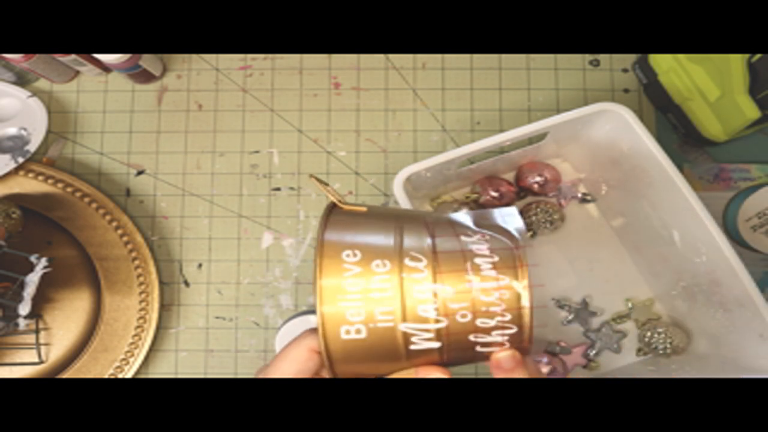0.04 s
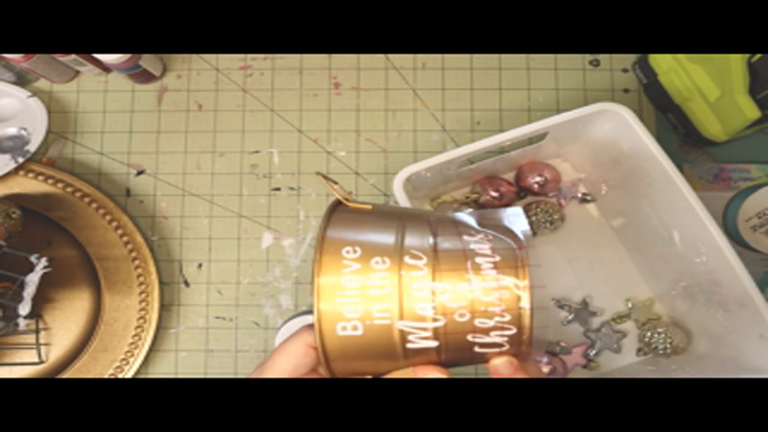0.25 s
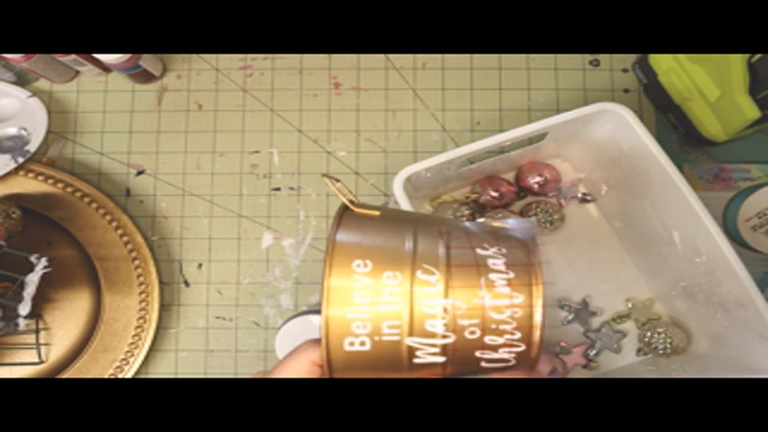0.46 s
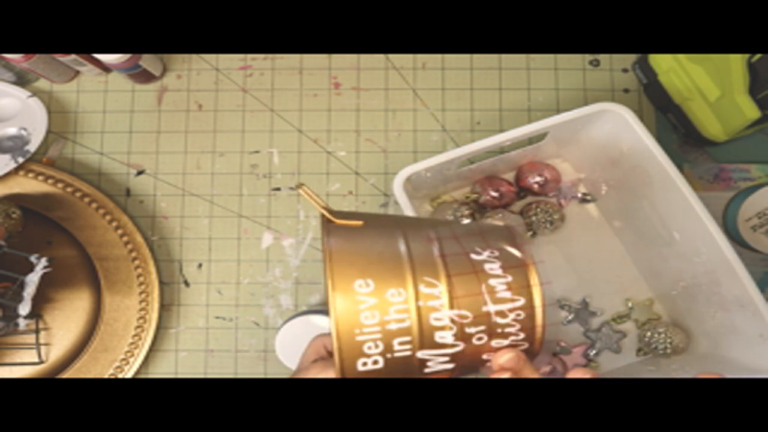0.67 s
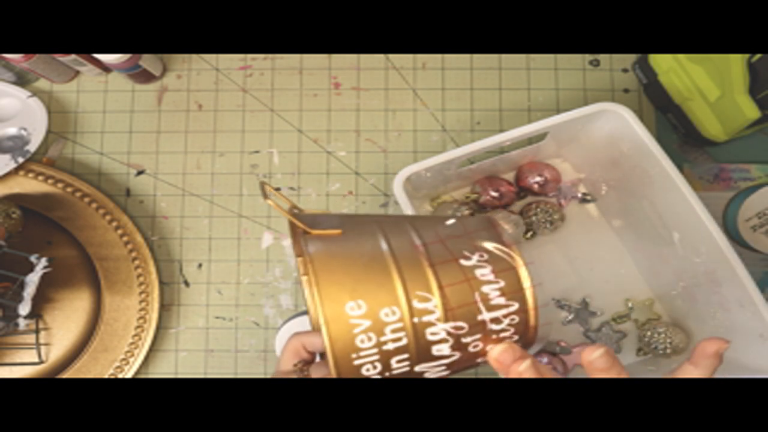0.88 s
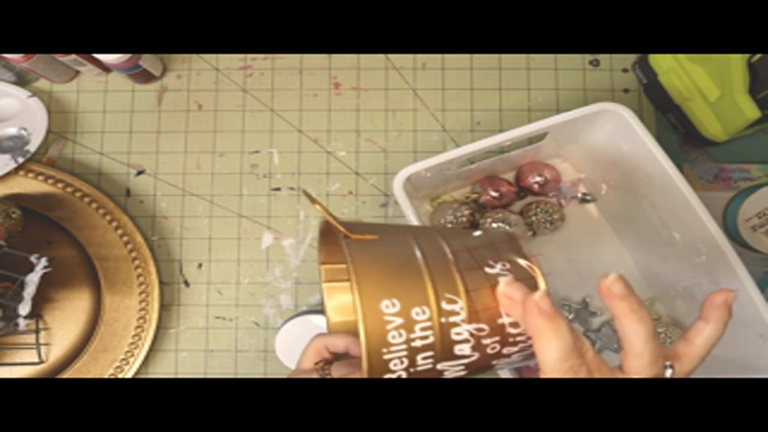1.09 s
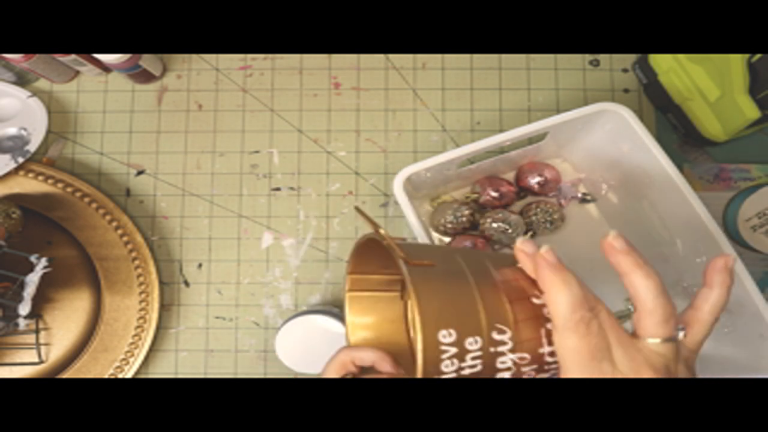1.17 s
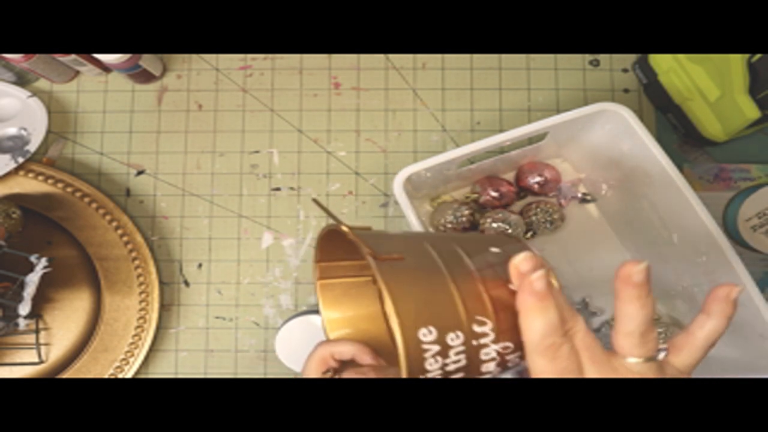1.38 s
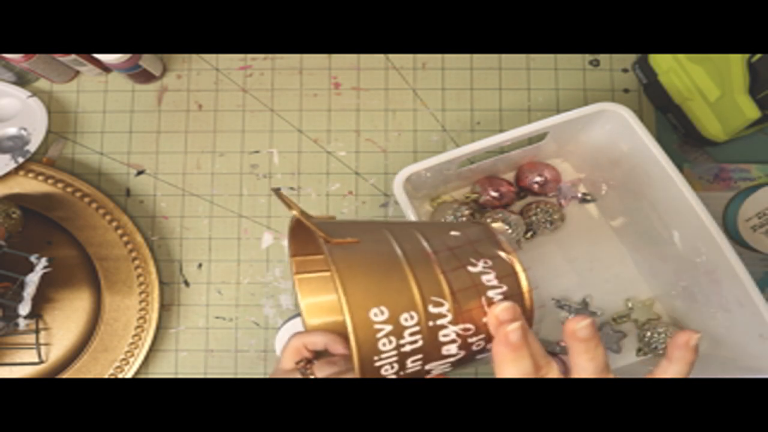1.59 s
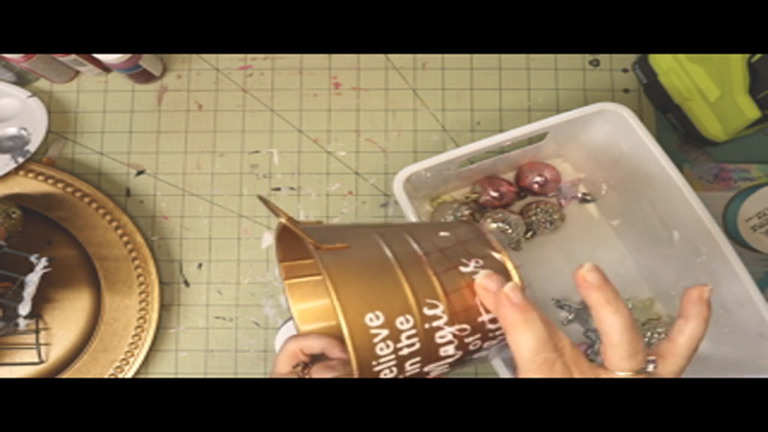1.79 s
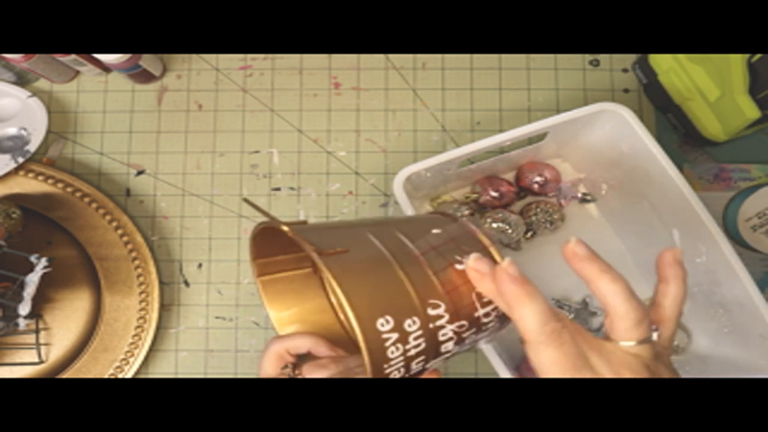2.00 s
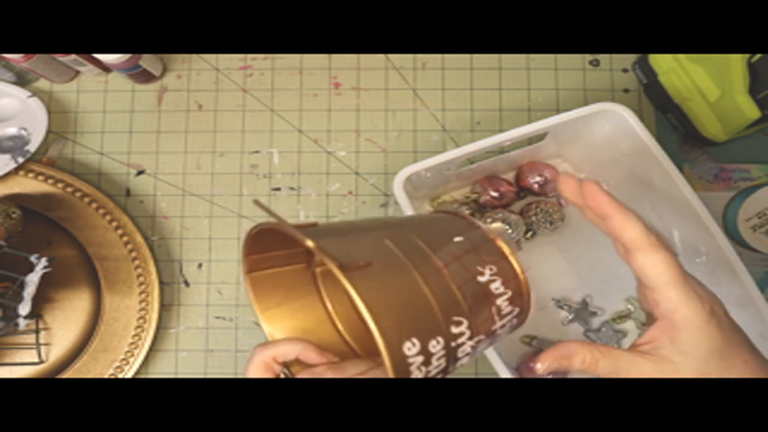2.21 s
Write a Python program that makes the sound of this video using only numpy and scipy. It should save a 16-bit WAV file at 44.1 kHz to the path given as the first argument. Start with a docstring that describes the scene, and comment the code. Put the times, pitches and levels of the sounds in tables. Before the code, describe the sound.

In a small room with a low hum and soft hiss, someone handles a little metal pail near the microphone. A few thin ticks and a faint slide of the palm lead to a sharp clink as the wire handle scrapes and hits the wall. The metal barely rings under the fingers. Following a pause, the handle rattles in quick clicks, pings and scrapes, ending with a few light ticks.

```python
"""A wire handle scrapes the rim and ticks in the lugs of a small sheet-metal bucket, turned by hand.
Scrapes are dense slips; ticks are snaps with brief chatter. Both drive the shell, which the fingers damp,
so it rings only briefly. Palm and fingers rub the metal; the handle knocks on the wall and pings
when flicked. Low hum and soft air noise fill the small room. Gain control ducks after loud clinks."""
import sys
import numpy as np
from scipy import signal
from scipy.fft import rfft, irfft
from scipy.io import wavfile

SR = 44100
rng = np.random.default_rng(int(sys.argv[2]) if len(sys.argv) > 2 else 0)


def transcribe(signal):
    """Save signal, clipped to [-1, 1], as a 16-bit WAV file at the path in sys.argv[1]."""
    frames = np.atleast_2d(signal).T
    limited = np.clip(frames, -1, 1)
    pcm = np.round(limited * 32767).astype(np.int16)
    wavfile.write(sys.argv[1], SR, pcm)


N = 99004

# Table levels are relative.
# wire on rim: crest t/s, level/dB, rise/ms, fall/ms, body/dB, top edge f/Hz, spot tones [f/Hz, level/dB]
RIM_SCRAPES = [(0.0008, -21.5, 0.91, 2.2, -5.5, 12800, [(5300, -18), (6900, -34)]),
               (0.182, -33, 2.5, 1.6, 3, 9400, [(2780, -8), (4300, -15), (6300, -24)]),
               (0.522, -36.5, 17, 11.4, -0.5, 15500, [(3780, -10), (5490, -10), (6740, -15)]),
               (0.5755, -26, 4.2, 7.1, -12, 10800, [(3650, -20), (4950, -13), (5520, -9)]),
               (0.582, -16.5, 0.28, 5.9, -6.5, 14200, [(1630, -11.5), (2750, -12.5), (9070, -12)]),
               (0.5851, -19, 0.41, 1.8, -3, 11550, [(1630, -20), (5010, -13), (10700, -8)]),
               (0.6163, -16, 3.3, 4.5, -3.5, 13200, [(2050, -8.5), (6500, -33)]),
               (0.6214, -11.5, 0.73, 3, -13, 13700, [(1720, -8), (4740, -13), (8770, -0.5), (10800, -14)]),
               (0.635, -29, 5.9, 5.7, 11, 15000, []), (1.4105, -38, 0.53, 0.84, 0, 12000, [(2950, 1)]),
               (1.5572, -18, 1.8, 4.5, -7, 12900, [(4280, -18), (5500, -29), (6900, -10), (9450, -22)]),
               (1.6207, -28.5, 2.8, 1.8, -0.5, 10000, [(6540, -7), (7670, -24)]),
               (1.6242, -33.5, 1.2, 2.1, -2, 9500, [(1050, -16), (2460, -2), (4550, 4.5)]),
               (1.634, -41.5, 3.2, 9, 5, 9500, [(1950, 0)])]
# scrape spectrum: f/Hz, level/dB
SCRAPE_SPECTRUM = [(100, -21), (400, -20), (1200, -8.5), (2500, -7), (3900, -2.5), (5000, -4.5),
                   (7000, -4.5), (9300, -0.5), (10800, 4), (12500, -10.5), (14500, -7.5), (16000, -20)]
# held bucket: f/Hz, width/Hz, level/dB
SHELL_MODES = [(390, 81, -0.5), (833, 110, 6.5), (1140, 430, -3.5), (1720, 96, 11.5), (1730, 59, 8),
               (2070, 65, 2.5), (2850, 100, 4), (3750, 47, -19), (4000, 59, -7), (6200, 600, 2),
               (9200, 290, -13), (9970, 730, -4), (11080, 120, 1), (11700, 90, 6)]
# hum tones: f/Hz, level/dB
HUM_TONES = [(33.8, -64), (99.8, -49), (120, -59.5), (199.6, -54), (239.3, -64.5), (299.4, -55), (399, -52),
             (498.9, -62.5), (598.5, -54.5), (898, -66), (1096, -64)]
# hum swell, before centring and scaling: t/s, level/dB
HUM_CONTOUR = [(0.0, -45.5), (0.22, -51.5), (0.7, -49.5), (1.32, -46.5), (1.38, -49.5), (2.05, -49.5),
               (2.24, -55.5)]
# air noise density: f/Hz, level/dB
AIR_SPECTRUM = [(20, -11), (55, -0.5), (160, -3.5), (260, 0), (350, 3.5), (500, -4), (680, 1), (880, -4),
                (1250, 1.75), (2000, -3), (3800, -11), (6500, -18.5), (10500, -30.5), (13000, -38),
                (15500, -70)]
# air noise width: f/Hz, left-right coherence
AIR_COHERENCE = [(60, 1), (290, 0.59), (640, 0.51), (1400, -0.45), (3100, -0.56), (15000, -0.91)]
# wall reflections: f/Hz, level/dB
ROOM_SPECTRUM = [(300, -15), (1700, 14.5), (4500, 3), (7500, -9.5), (10300, -10), (13500, -15),
                 (16000, -27)]
# room decay: f/Hz, T60/s
ROOM_DECAY = [(300, 0.037), (2000, 0.1), (7000, 0.29), (14000, 0.26)]
# handle in lugs: t/s, level/dB, peak f/Hz, chatter/ms, sheet ring/dB, top edge f/Hz, pan/dB, lug ring/dB
LUG_TICKS = [(0.0229, -16.5, 9450, 0.29, -6, 13500, 6, -47), (0.158, -27.5, 8900, 0.2, -9, 13900, 6, -25),
             (0.1773, -30, 7400, 0.84, -4, 11600, -4, -14), (0.1997, -26, 8200, 0.15, 0, 14700, 1.5, -19),
             (0.2355, -29.5, 9600, 0.4, -3, 13800, 4.5, -17), (0.513, -40, 11800, 0.2, -11, 15500, 2, -21),
             (1.1557, -31.5, 6800, 0.26, -10.5, 11700, 10, -12),
             (1.2916, -27, 9200, 0.066, -5, 15100, 4, -16.5), (1.3396, -24, 6300, 16, -27, 11900, 3, -22),
             (1.3470, -22, 8000, 1.8, -2, 14400, 4, -15), (1.3757, -31.5, 8900, 2.7, -3, 14000, 2, -24),
             (1.4124, -23, 10900, 0.7, -3, 12400, -1, -32), (1.4343, -51.5, 5950, 0.74, -16, 9000, -3, -20),
             (1.466, -42.5, 7550, 1.9, -53, 12400, 3, -39), (1.4797, -38.5, 7000, 1.1, -1, 10400, 1, -34),
             (1.5093, -29.5, 9400, 1.0, -5, 11600, 2, -12), (1.5177, -34, 9400, 1.2, -4, 12000, 4, -3),
             (1.5487, -40, 7900, 0.76, -5, 10200, -15, -21), (1.5746, -21.5, 9500, .7, -5, 12900, 3, -19),
             (1.611, -38, 10200, 1.1, -10, 13000, 5, -18), (1.6153, -34, 7760, 1.4, 9, 12600, -5, -22),
             (1.8710, -45, 9800, 0.35, -15, 15500, 2.5, -29), (1.991, -31, 8200, 0.27, 0, 14500, 2, -12),
             (1.9973, -33.5, 10200, 0.8, -1, 15200, 5, -16), (2.0034, -42, 10300, 0.5, 3, 14500, 1, -18)]
# tick spectrum: f/Hz, level/dB
TICK_SPECTRUM = [(100, -31), (700, -56), (1700, -15.5), (3700, -11), (4700, -8), (8000, -4), (11000, 5),
                 (12500, 4), (14500, -6), (16000, -3)]
# riveted lug: f/Hz, width/Hz, level/dB
LUG_MODES = [(3990, 47, -3), (4720, 67, 6)]
# wall under the palm: f/Hz, width/Hz, level/dB
SLIDE_MODES = [(1340, 120, -9), (2060, 100, -5), (3780, 160, 3), (5480, 180, -3)]
# handle on wall: t/s, level/dB, contact/ms
WALL_KNOCKS = [(0.6192, 12, 0.038), (1.6220, -8, 0.038)]
# grip changes: crest t/s, level/dB
GRIP_STROKES = [(0.75, -65), (1.15, -64.5), (1.33, -51)]
# skin on sheet: f/Hz, level/dB
RUB_SPECTRUM = [(500, -40), (2500, 2), (3800, 1), (6500, 3), (10500, 5.5), (12500, -1), (15500, -22)]
# flicks of the handle: t/s, level/dB, contact/ms
WIRE_FLICKS = [(1.1560, -43, 0.0093), (1.3470, -1.5, 0.012), (1.5744, -10.5, 0.017)]
# gripped handle: f/Hz, width/Hz, level/dB
WIRE_MODES = [(4380, 120, 6), (6000, 440, 2), (6800, 770, 16.5)]


def amp(db):
    """Decibels to gain."""
    return 10 ** (np.asarray(db) / 20)


def unit(x):
    """Scales to unit energy."""
    return x / np.linalg.norm(x)


def lookup(table, hz):
    """Interpolates over log frequency."""
    f, value = np.transpose(table)
    return np.interp(np.log(hz + 1), np.log(f + 1), value)


def add(mix, at_s, sound):
    """Mixes in a stereo sound."""
    start = round(at_s * SR)
    sound = sound[:, max(-start, 0):]
    part = mix[:, max(start, 0):][:, :sound.shape[1]]
    part += sound[:, :part.shape[1]]


def panned(x, pan_db):
    """Positive pan is left."""
    return x * amp([[pan_db / 2], [-pan_db / 2]])


def noise_pair(count, coherence):
    """Partly coherent stereo white noise."""
    left, other = rng.standard_normal((2, count))
    return np.array([left, coherence * left + np.sqrt(1 - coherence ** 2) * other])


def drift(rate_hz):
    """Slow noise of unit spread."""
    hz = np.fft.rfftfreq(N, 1 / SR)
    slow = irfft(rfft(rng.standard_normal(N)) / (1 + (hz / rate_hz) ** 4), N)
    return slow / slow.std()


def crest(t, rise, fall):
    """Exponential rise and fall; 1 at t = 0."""
    return np.exp(np.minimum(t / rise, -t / fall))


def smoothed(x, time_s):
    """One-pole running mean."""
    pole = np.exp(-1 / (time_s * SR))
    return signal.lfilter([1 - pole], [1, -pole], x)


def rolloff_db(f, top_hz, steepness=18):
    """Treble edge of a contact: lower for a softer touch."""
    return -10 * np.log10(1 + (f / top_hz) ** steepness)


def coloured(x, db_at, size=1024):
    """Minimum-phase filter of unit energy, shaped by db_at(f/Hz)."""
    log_gain = np.log(amp(db_at(abs(np.fft.fftfreq(size, 1 / SR)))))
    taps = np.fft.ifft(np.exp(np.conj(signal.hilbert(log_gain)))).real[:size // 2]
    return signal.fftconvolve(x, unit(taps)[None], axes=1)


def resonate(force, modes, alternate=False):
    """Driven modes of a metal part; neighbours optionally in antiphase."""
    out = np.zeros_like(force)
    for k, (hz, width_hz, db) in enumerate(modes):
        radius = np.exp(-np.pi * width_hz / SR)
        pole = radius * np.exp(2j * np.pi * hz / SR)
        sign = (-1) ** k if alternate else 1
        out += sign * amp(db) * 2 * signal.lfilter([1 - radius], [1, -pole], force).real
    return out


def pushes(rows, pan_db):
    """One-sided force pulses: longer contact, duller blow."""
    out, ms = np.zeros((2, N)), np.arange(64) * 1e3 / SR
    for at_s, db, contact_ms in rows:
        push = np.exp(-ms / contact_ms)
        add(out, at_s, panned(amp(db) * push / push.sum(), pan_db))
    return out


def scrapes(slips_per_s=1500, slip_db=7, drag_db=-42, body_hz=3500, spot_width_hz=140,
            gain_db=-3, pan_db=2.5):
    """Wire drags, bites and comes free in tiny slips. Returns the rasp and the touched spot's tones."""
    rasp, tones = np.zeros((2, 2, N))
    ms = np.arange(-SR // 16, SR // 8) * 1e3 / SR
    for crest_s, db, rise_ms, fall_ms, body_db, top_hz, spot in RIM_SCRAPES:
        slips = noise_pair(len(ms), 0.59)
        slips *= 1 + amp(slip_db) * (rng.random(len(ms)) < slips_per_s / SR)
        bite = crest(ms, rise_ms, fall_ms)
        pressure = np.maximum(bite, amp(drag_db) * crest(ms, rise=15, fall=7.9))
        start_s = crest_s - np.sum(ms < 0) / SR
        strength = amp(db + gain_db) * np.sqrt(2) * np.linalg.norm(pressure)

        def spectrum_db(f):
            shelf_db = body_db / (1 + (f / body_hz) ** 4)  # a firm push adds lows
            return lookup(SCRAPE_SPECTRUM, f) + shelf_db + rolloff_db(f, top_hz)

        add(rasp, start_s, strength * unit(coloured(slips * pressure, spectrum_db)))
        for hz, tone_db in spot:
            tone = resonate(slips * bite, [(hz, spot_width_hz, 0)])
            add(tones, start_s, strength * amp(tone_db) * unit(tone))
    return panned(rasp, pan_db), panned(tones, pan_db)


def shell(friction, tick, friction_db=-10, tick_db=-17):
    """Contacts briefly ring the finger-damped bucket."""
    return resonate(amp(friction_db) * friction + amp(tick_db) * tick, SHELL_MODES)


def hum(swell_share=0.47, waver_db=-0.25, waver_hz=3, full_swell_hz=400):
    """Steady low tones; the upper ones swell and waver most."""
    t, tones = np.arange(N) / SR, np.zeros(N)
    contour_db = np.interp(t, *np.transpose(HUM_CONTOUR))
    swell_db = swell_share * (contour_db - contour_db.mean())
    for hz, db in HUM_TONES:
        level_db = db + min(hz / full_swell_hz, 1) * (swell_db + waver_db * drift(waver_hz))
        tones += amp(level_db) * np.sin(2 * np.pi * (hz * t + rng.random()))
    return panned(np.sqrt(2) * tones, pan_db=-1)


def air(mid_db=-46.5, mid_low_hz=700, mid_high_hz=3000):
    """Steady room noise: coherent in the bass, wide in the treble."""
    hz = np.fft.rfftfreq(N, 1 / SR)
    left, other = rfft(rng.standard_normal((2, N))) * amp(lookup(AIR_SPECTRUM, hz))
    coherence = lookup(AIR_COHERENCE, hz)
    right = coherence * left + np.sqrt(1 - coherence ** 2) * other
    mid_rms = irfft(left * (hz > mid_low_hz) * (hz < mid_high_hz), N).std()
    return irfft(np.array([left, right]), N) / mid_rms * amp(mid_db)


def room(x, gap_s=0.012, coherence=-0.65, tails=3, cycle_hz=40):
    """Diffuse tails with per-band decay, fed in turn so no two ticks fade alike."""
    out = np.zeros((2, N))
    for k in range(tails):
        hz, t, bands = signal.stft(noise_pair(SR // 4, coherence), SR, nperseg=256)
        db = lookup(ROOM_SPECTRUM, hz)[:, None] - 60 * t / lookup(ROOM_DECAY, hz)[:, None]
        tail = signal.istft(bands * amp(db), SR, nperseg=256)[1]
        tail *= np.arange(tail.shape[1]) / SR > gap_s
        feed = np.sqrt(2 / tails) * np.cos(np.pi * (cycle_hz * np.arange(N) / SR + k / tails))
        out += signal.oaconvolve(x[:1] * feed, tail / np.linalg.norm(tail[0]), axes=1)[:, :N]
    return out


def tick_coloured(x, peak_hz, top_hz, peak_db, width_hz=2000, pivot_hz=9000):
    """Tick spectrum: a bright tick is also thin in the lows."""
    def spectrum_db(f):
        tilt_db = 9 * np.log2(peak_hz / pivot_hz) * np.log2(np.maximum(f, pivot_hz / 4) / pivot_hz)
        bump_db = peak_db * np.exp(-((f - peak_hz) / width_hz) ** 2)
        return lookup(TICK_SPECTRUM, f) + tilt_db + rolloff_db(f, top_hz) + bump_db

    return coloured(x, spectrum_db)


def ticks(chatter_db=-10, ring_ms=3.3, ring_edge_share=0.73, gain_db=2):
    """Wire snaps on its lug and chatters; bending waves circle the sheet. Square hits ring the lug."""
    out, ms = np.zeros((2, N)), np.arange(SR // 32) * 1e3 / SR
    strength = np.sqrt(2 * np.sum(ms < 1))  # energy of 1 ms at unit level
    for at_s, db, peak_hz, chatter_ms, ring_db, top_hz, pan_db, lug_db in LUG_TICKS:
        force = amp(chatter_db) * noise_pair(len(ms), 0.5) * np.exp(-ms / chatter_ms)
        force[:, 0] += 1
        snap = tick_coloured(force, peak_hz, top_hz, peak_db=9)
        waves = noise_pair(len(ms), 0.58) * np.exp(-ms / ring_ms)
        ring = tick_coloured(waves, peak_hz, ring_edge_share * top_hz, peak_db=4)  # duller: highs die first
        lug = resonate(snap, LUG_MODES, alternate=True)
        tick = unit(snap) + amp(ring_db) * unit(ring) + amp(lug_db) * unit(lug)
        add(out, at_s, panned(amp(db + gain_db) * strength * unit(tick), pan_db))
    return out


def slide(crest_s=0.39, rise_s=0.14, fall_s=0.04, drive_db=-44, grain_hz=40, grain_db=3):
    """The bucket turns in the palm; dry friction drives a few wall modes."""
    envelope = crest(np.arange(N) / SR - crest_s, rise_s, fall_s)
    pressure = amp(drive_db + grain_db * drift(grain_hz)) * envelope
    return resonate(noise_pair(N, 0) * pressure, SLIDE_MODES, alternate=True)


def knocks(gain_db=-4):
    """The handle lands on the wall and rings the shell."""
    return amp(gain_db) * resonate(pushes(WALL_KNOCKS, pan_db=0.5), SHELL_MODES, alternate=True)


def rub(rest_db=-70, rise_s=0.048, fall_s=0.028, grain_hz=60, grain_db=2):
    """Skin catches and slides on the sheet: faint hiss, swelling at each grip change."""
    t = np.arange(N) / SR
    strokes = sum(amp(db) * crest(t - crest_s, rise_s, fall_s) for crest_s, db in GRIP_STROKES)
    friction = noise_pair(N, 0.27) * (amp(rest_db) + strokes) * amp(grain_db * drift(grain_hz))
    return coloured(friction, lambda f: lookup(RUB_SPECTRUM, f))[:, :N]


def pings(band_hz=(3600, 13000)):
    """The flicked handle rings for a few ms; thin wire radiates no lows."""
    ring = resonate(pushes(WIRE_FLICKS, pan_db=0), WIRE_MODES)
    return signal.sosfilt(signal.butter(4, band_hz, "band", fs=SR, output="sos"), ring)


def right_delayed(x, lag_s):
    """Sound reaches the right channel later."""
    delay = np.exp(-2j * np.pi * np.fft.rfftfreq(2 * N, 1 / SR) * lag_s)
    return np.array([x[0], irfft(rfft(x[1], 2 * N) * delay)[:N]])


def scene(room_db=-14, right_lag_s=3.9e-5):
    """Bucket close by, slightly left, over hum and air; the rim's spot tones bypass the room."""
    rasp, spot_tones = scrapes()
    tick = ticks()
    friction = rasp + rub()
    bucket = friction + tick + shell(friction, tick) + slide() + knocks() + pings()
    direct = right_delayed(bucket + spot_tones, right_lag_s)
    return direct + amp(room_db) * room(bucket) + hum() + air()


def record(dry, threshold_db=-27, slope=0.41, recovery_db_per_s=9, start_cut_db=4,
           sense_s=0.0046, attack_s=0.0025, edge_hz=16400):
    """Gain control ducks the mix at loud clinks and creeps back; then a low-pass."""
    power_db = 10 * np.log10(smoothed((dry ** 2).mean(0), sense_s) + 1e-12)
    cut_db = slope * np.maximum(power_db - threshold_db, 0)
    cut_db[0] = start_cut_db
    recovery_db = recovery_db_per_s * np.arange(N) / SR
    held_db = np.maximum.accumulate(cut_db + recovery_db) - recovery_db
    ducked = dry * amp(-smoothed(held_db, attack_s))
    lowpass = signal.firwin(511, edge_hz, window=("kaiser", 9), fs=SR)
    return signal.oaconvolve(ducked, lowpass[None], "same")


dry = scene()
out = record(dry)
transcribe(out)
```